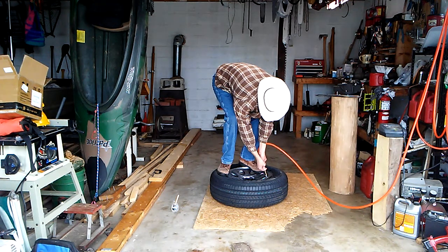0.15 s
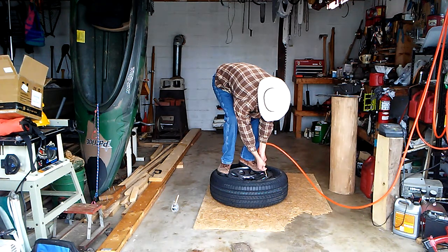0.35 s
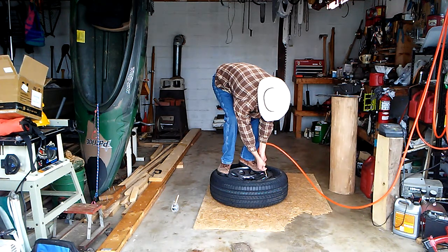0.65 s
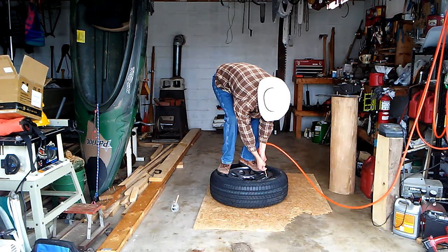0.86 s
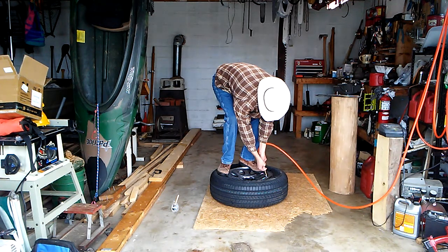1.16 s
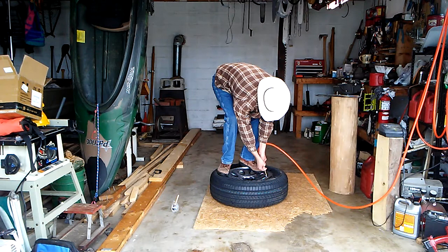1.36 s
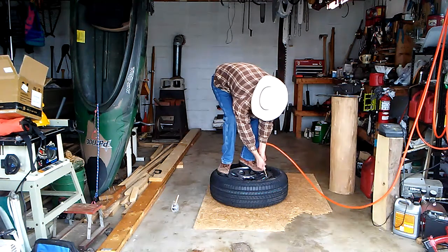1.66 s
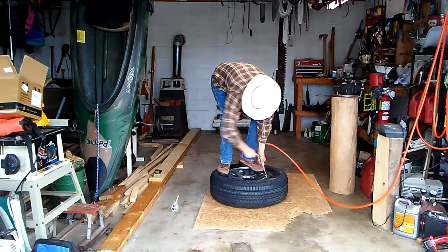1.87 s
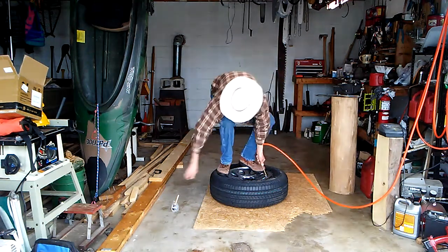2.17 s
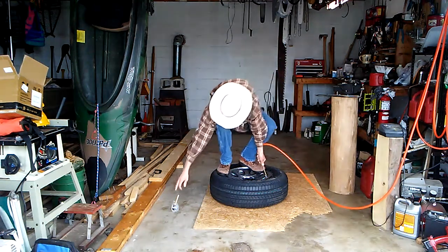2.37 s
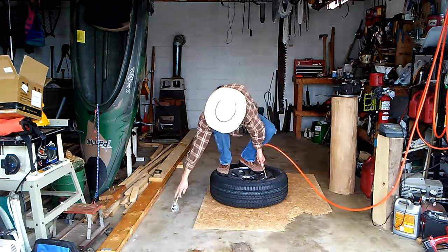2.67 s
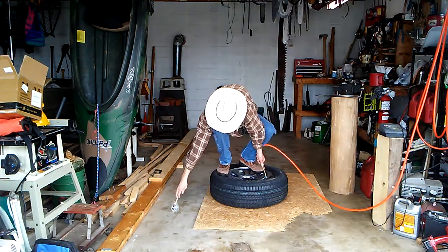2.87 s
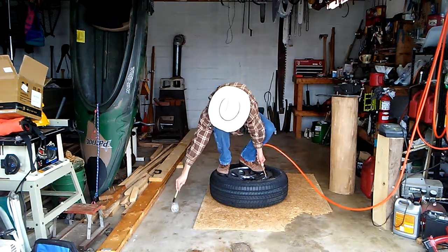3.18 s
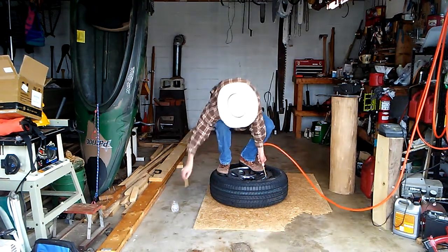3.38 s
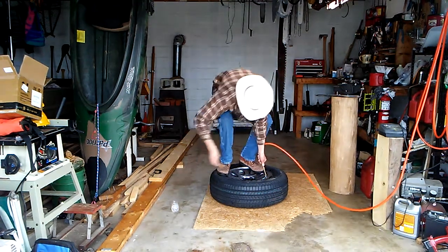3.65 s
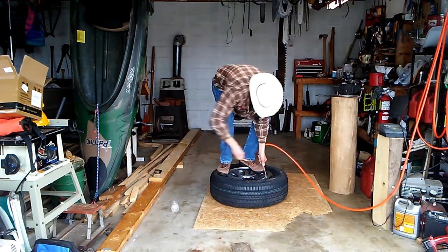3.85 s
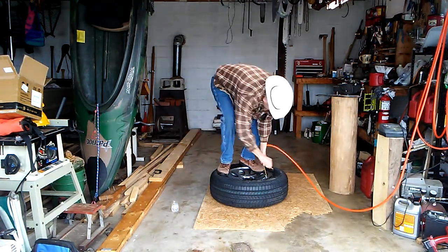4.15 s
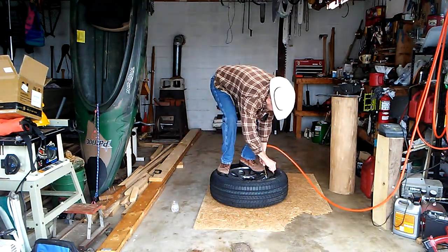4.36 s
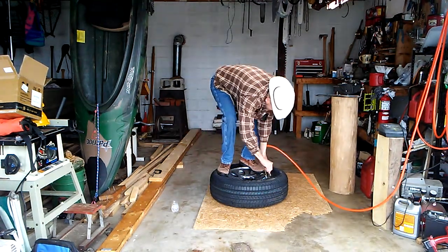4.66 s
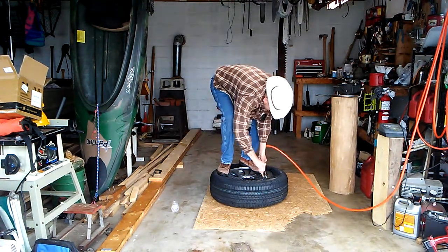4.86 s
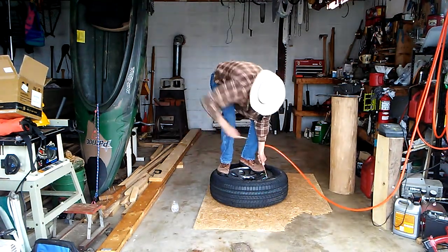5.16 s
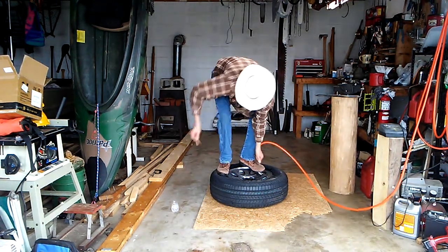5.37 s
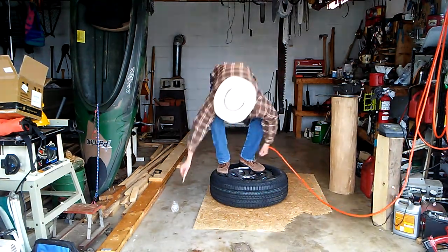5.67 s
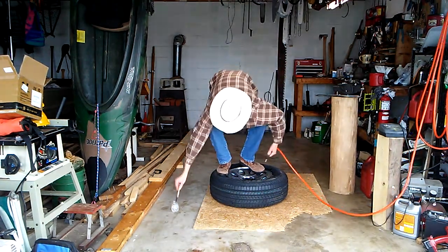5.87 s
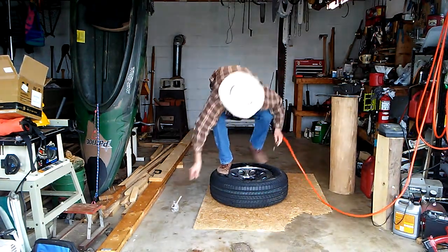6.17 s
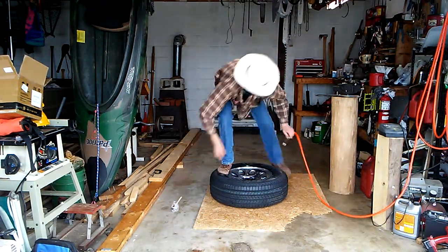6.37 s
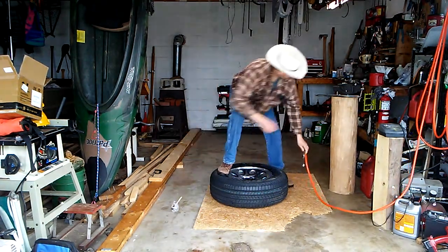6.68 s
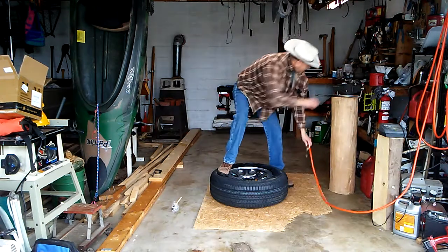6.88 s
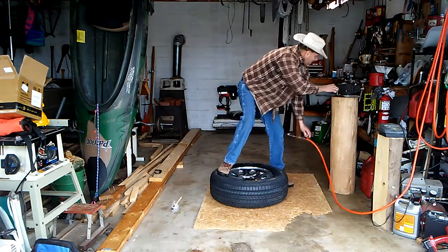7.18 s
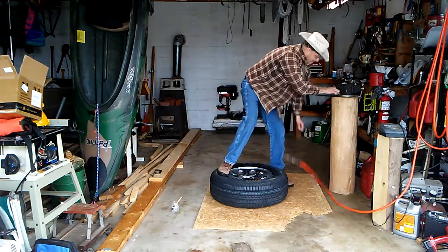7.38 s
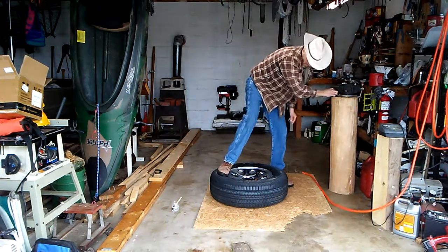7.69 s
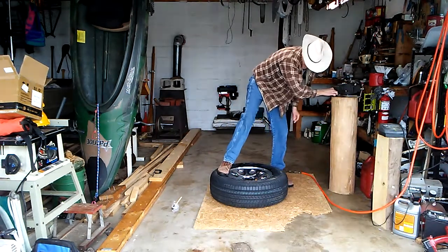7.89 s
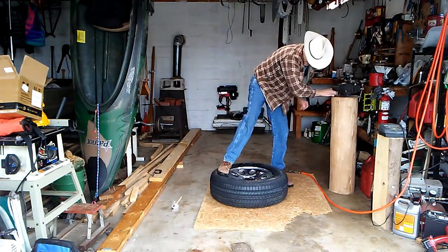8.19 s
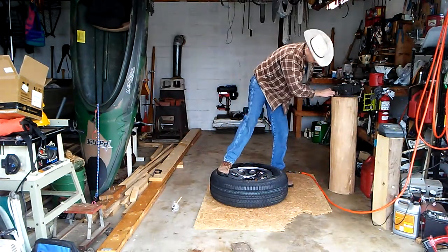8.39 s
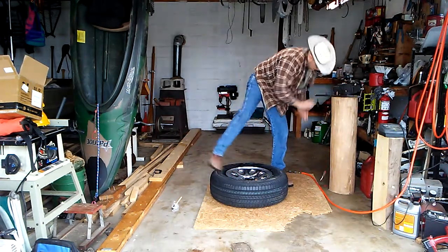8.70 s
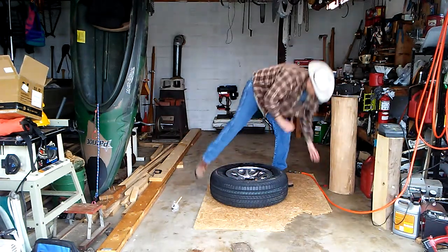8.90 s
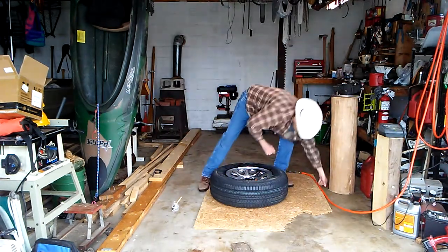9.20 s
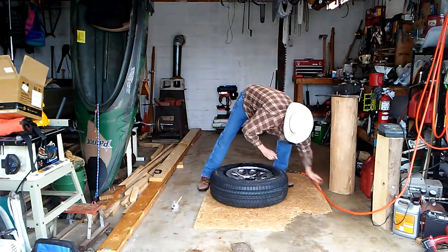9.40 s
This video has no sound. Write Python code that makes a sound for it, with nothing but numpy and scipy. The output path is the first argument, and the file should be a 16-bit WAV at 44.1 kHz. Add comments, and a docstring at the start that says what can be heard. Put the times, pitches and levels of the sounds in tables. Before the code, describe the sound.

In a cluttered garage, an air compressor runs without pause, a buzzing, clattering mid-range drone under a thin, wavering hiss. About three seconds in, air spits at a tyre valve and leaks on, fading. Near five seconds a heavy hollow knock judders, followed by another short spit. Later come bright clicks, small air spits and a softer knock. The microphone hears everything from some distance, centred, with short room reflections.

```python
"""An air compressor runs steadily in a cluttered garage while a tyre is filled through a hose.
Each shaft turn drives a stack of sine tones, a repeating clatter and two puffs of noise; faint steady tones
are likely its cooling fan. Filtered noise makes a thin hiss that surges and sags, and a jet of air at the valve
that spits as the chuck goes on and comes off. Short noise bursts make the clicks of metal fittings, and
trains of bursts make something heavy knock and judder."""
import sys
import numpy as np
from scipy import signal
from scipy.fft import rfft, irfft
from scipy.io import wavfile
from scipy.ndimage import uniform_filter1d, minimum_filter1d

SR = 44100
rng = np.random.default_rng(int(sys.argv[2]) if len(sys.argv) > 2 else 0)


def generate_wav(sig):
    """Save sig (samples, or channels by samples) to the path in sys.argv[1] as 16-bit PCM at SR."""
    pcm = np.round(np.clip(np.atleast_2d(sig).T, -1, 1) * 32767).astype(np.int16)
    wavfile.write(sys.argv[1], SR, pcm)


N = 420710
TIME = np.arange(N) / SR  # seconds
FREQ = np.maximum(np.fft.rfftfreq(N, 1 / SR), 1)  # Hz, kept above 0 so its logarithm exists

SHAFT_HZ = 54.46  # turns per second
# tones of the machine: shaft_multiple, relative_level_db
SHAFT_TONES = [(1, -46), (2, -54), (3, -41), (4, -41), (5, -40), (6, -38), (6.5, -33), (7, -27), (8, -36),
               (10, -35), (11, -29), (12, -28), (13, -29), (14, -33), (16, -33), (17, -31), (23, -30),
               (24, -36), (25, -38), (28, -36), (33, -31), (34, -30), (35, -33), (47, -36), (52, -35),
               (53, -38), (54, -34), (61, -38), (71, -38), (74, -39)]
# groups of tones that each swell once, slowly: centre_hz, reach_hz, resting_db, peak_s, half_length_s, lift_db
TONE_SWELLS = [(870, 30, -2, 8.2, .5, 7), (1850, 80, -1.5, 5.5, 1.9, 4.5), (2830, 30, -1, 1.18, 1.2, 9.5)]
# noise of the pump, cut off steeply at the top: pitch_hz, relative_level_db
PUMP_COLOUR = [(25, -101), (120, -79.5), (165, -62.5), (258, -58), (275, -52.5), (750, -52.5),
               (1050, -55.5), (1350, -56), (1950, -50.5), (2900, -53.5), (3400, -56.5), (4020, -59),
               (4230, -69), (4480, -101.5)]
# resonances of tank and shroud: centre_hz, width_hz, lift_db
SHROUD_RESONANCES = [(344.8, 47, 6), (894, 62, 4), (2154, 30, 6.5), (2453, 36, 5), (3740, 150, 7),
                     (4027, 28, 11)]
# a second, faster rotor, likely the cooling fan: pitch_hz, rms_level_db
FAN_TONES = [(91.8, -59), (183.6, -40.5), (195.5, -51)]

# tone colour of the thin hiss: pitch_hz, relative_level_db
HISS_SPECTRUM = [(4400, -26), (4750, -30), (5400, -12), (5900, -7), (7100, 2), (9100, 0.5), (9600, 0),
                 (11400, -5), (12200, -11), (13000, -23), (14000, -37), (15500, -62)]
# faint whistles within the hiss: centre_hz, width_hz, lift_db
HISS_WHISTLES = [(5840, 70, 8), (6180, 15, 13), (7540, 18, 3), (9160, 150, 6.5)]
# resting level of the hiss and the spread of its slower wander
HISS_DB, HISS_WANDER_DB = -33, .7
# times when the hiss rises fast and falls back more slowly: start_s, hold_s, lift_db
HISS_SURGES = [(0.608, 0.4, 2), (1.357, .06, 3.5), (1.77, .04, 3), (2.28, .08, 3.5), (6.3, .08, 3),
               (6.68, 0.053, 3), (7.43, 0.44, 2), (8.523, .1, 5), (9.18, .05, 2.5)]
SURGE_ATTACK_S, SURGE_T60_S = .03, 0.22  # t60: time to fall by 60 dB
# times when the hiss sags and then snaps back: return_s, depth_db
HISS_SAGS = [(.61, 4), (5.7, 5.5), (6.3, 8)]
SAG_LENGTH_S, SAG_RETURN_S = 0.24, .02  # whole sag, and the snap back at its end
# tone colour of the air jet: pitch_hz, relative_level_db
JET_SPECTRUM = [(2760, -72), (4700, -76), (4990, -28), (5710, -10.5), (6030, -4.5), (6900, 2), (8180, 5.5),
                (11300, 0), (15500, -28)]
# air escaping between chuck and valve: a long leak, stronger at first, a spit as the chuck goes on and
# as it comes off, and a last trickle: start_s, hold_s, level_db, t60_s
AIR_JETS = [(3.12, 2.25, -26.5, 0.97), (3.115, 0.73, -22.7, 2.2), (3.224, .01, -16, 0.59),
            (5.202, .006, -14.5, 0.27), (5.68, 0.4, -35, .3)]
JET_ATTACK_S = 0.048

# bright clicks, scuffs and spits of air from the fittings: start_s, relative_level_db, t60_s
CLICK_EVENTS = [(2.328, -30, .3), (4.97, -15, 0.054), (5.243, -26, 0.11), (7.531, -18.5, 0.46),
                (7.809, -22.5, 0.39), (8.366, -22, 0.51), (8.424, -24, .15), (8.551, -31, .2),
                (8.897, -30, .2)]
# tone colour of the clicks: pitch_hz, relative_level_db
CLICK_SPECTRUM = [(2800, -57), (4700, -37), (5700, -10), (7000, 1), (8400, 6), (9800, -3), (11500, -5),
                  (13000, -21), (15500, -35)]

# dull knocks that judder on: start_s, relative_body_db, relative_crack_db, hold_s, later_fade_db_per_s
KNOCK_EVENTS = [(4.967, -5.5, 7, 0.085, 100), (7.53, -19, -3, .015, 240)]
# tone colour of the hollow body: pitch_hz, relative_level_db
BODY_SPECTRUM = [(30, -11), (85, -25), (120, -16), (170, -7.5), (250, -1), (335, 8.5), (470, 6.5),
                 (600, 10.5), (750, -5), (950, -7), (1150, -16), (1550, -2), (2500, -41), (4500, -59),
                 (15000, -70)]
# tone colour of the crack on each blow: pitch_hz, relative_level_db
CRACK_SPECTRUM = [(30, -18), (100, -25), (180, -19), (380, -6), (510, 3), (680, 3.5), (780, 0), (910, -1),
                  (1200, -8), (1550, -7), (2500, -13), (3600, -10), (4700, -46), (7000, -19), (15000, -55)]
# tone colour of the snap on the hardest blows: pitch_hz, relative_level_db
SNAP_SPECTRUM = [(300, -12), (1200, 2), (4000, -4), (7000, -5), (12000, -5), (14500, -10), (15600, -24)]
# the blows of a judder come ever further apart, and each cracks less than the one before
JUDDER_GAP_S, JUDDER_GROWTH, CRACK_FALL_DB_PER_BLOW = .0065, 1.2, 3.5

CEILING, TOP_HZ = .97, 15700  # limiter ceiling (full scale is 1), and where the treble is cut


def undb(db):
    """Turn decibels into a multiplying gain."""
    return 10 ** (np.asarray(db) / 20)


def unit(x):
    """Scale to an rms (average strength) of 1."""
    return x / np.sqrt(np.mean(x ** 2))


def colour(x, points, resonances=()):
    """Shape a spectrum by points and resonances, with no sound ahead of the attack."""
    hz, db = np.transpose(points)
    lift_db = sum(lift / (1 + (2 * (FREQ - centre) / width) ** 2) for centre, width, lift in resonances)
    curve_db = np.interp(np.log(FREQ), np.log(hz), db) + lift_db
    # folding the cepstrum onto positive time gives a minimum-phase filter: attacks stay sharp
    cepstrum = irfft(np.log(undb(curve_db)), N)
    cepstrum[1:N // 2] *= 2
    cepstrum[N // 2 + 1:] = 0
    return irfft(rfft(x) * np.exp(rfft(cepstrum)), N)


def walk(rate):
    """Smooth random wander with spread 1, aiming at a new value rate times a second."""
    points = rng.standard_normal(4096)
    return np.interp(TIME * rate, np.arange(len(points)), points) * np.sqrt(3 / 2)


def garage(x, t60, wet_db):
    """Direct sound plus a dense, short echo tail from the walls and clutter."""
    t = TIME[:SR // 2]
    tail = rng.standard_normal(len(t)) * undb(-60 * t / t60) * (t > .004)
    wet = undb(wet_db)
    echo = signal.fftconvolve(x, tail / np.linalg.norm(tail))[:N]
    return (x + wet * echo) / np.hypot(1, wet)


def burst(start, db, t60):
    """A sudden push of noise that dies away."""
    age = TIME[:SR // 2]
    shot = rng.standard_normal(len(age)) * undb(db - 60 * age / t60)
    return np.pad(shot, (int(start * SR), N))[:N]


def envelope(start, attack, hold, t60):
    """Rise to 1, hold, die away."""
    age = TIME - start
    rise = np.clip(age / attack, 0, 1)
    return rise * undb(-60 * np.maximum(age - attack - hold, 0) / t60)


def tones(turns, tone_db=0.12, drift_db=-0.23, flutter=0.052):
    """Sine tones locked to the shaft; higher ones flutter and drift more in level."""
    out = 0
    for order, db in SHAFT_TONES:
        hz = order * SHAFT_HZ
        swell_db = sum(rest + lift * np.exp(-((TIME - peak) / length) ** 2)
                       for centre, reach, rest, peak, length, lift in TONE_SWELLS if abs(hz - centre) < reach)
        loose = min(hz / 700, 1)  # low tones stay steadier
        level = undb(db + swell_db + drift_db * loose * walk(1.116))
        level = level * (1 + flutter * loose * walk(30))
        out = out + level * np.sqrt(2) * np.sin(2 * np.pi * (order * turns + rng.random()))
    return out * undb(tone_db)


def clatter(turns, uneven_db=-10, clatter_hz=3200):
    """Valves and rod rattle in a repeating pattern, filling in between the main tones."""
    # a pattern two turns long: partials lie at every half multiple of the shaft rate
    partials = rng.standard_normal((1024, 2)) @ [1, 1j]
    partials[1::2] *= undb(uneven_db)  # alternate turns differ a little
    partials[[round(2 * order) for order, _ in SHAFT_TONES]] = 0
    cycle = unit(irfft(partials))
    rattle = np.interp(turns / 2, np.arange(len(cycle)) / len(cycle), cycle, period=1)
    # small hard parts radiate little bass
    return signal.sosfilt(signal.butter(1, clatter_hz, "high", fs=SR, output="sos"), rattle)


def pump(turns, clatter_db=-1.0, puff_db=-0.22, puff_decay=0.16, puff_depth=0.58, stroke_db=4.5):
    """Air puffs on intake and exhaust; the shroud rings with the puffs and the clatter."""
    half_turns = 2 * turns  # one puff in each half turn
    strength = undb(stroke_db * rng.standard_normal(2048))[half_turns.astype(int)]
    gate = 1 + puff_depth * strength * np.exp(-(half_turns % 1) / puff_decay)
    puffs = garage(unit(gate * rng.standard_normal(N)), t60=0.27, wet_db=-8.0)
    mix = clatter(turns) * undb(clatter_db) + puffs * undb(puff_db)
    return colour(mix, PUMP_COLOUR, SHROUD_RESONANCES) * np.sqrt(SR / 2)


def fan(waver=0.00066):
    """Faint low tones that share a slight waver in speed, apart from the shaft's."""
    clock = np.cumsum(1 + waver * walk(1.63)) / SR
    return sum(undb(db) * np.sqrt(2) * np.sin(2 * np.pi * (hz * clock + rng.random()))
               for hz, db in FAN_TONES)


def air(hiss_flicker_db=0.48, jet_flicker_db=0.57):
    """Noise of rushing air: a thin wavering hiss, and a sputtering jet between chuck and valve."""
    surge_db = sum(lift * envelope(start, SURGE_ATTACK_S, hold, SURGE_T60_S)
                   for start, hold, lift in HISS_SURGES)
    sag_db = sum(depth * np.interp(TIME, [end - SAG_LENGTH_S, end - SAG_RETURN_S, end], [0, 1, 0]) ** 2
                 for end, depth in HISS_SAGS)
    hiss = unit(colour(rng.standard_normal(N), HISS_SPECTRUM, HISS_WHISTLES))
    wander_db = hiss_flicker_db * walk(25) + HISS_WANDER_DB * walk(8)
    hiss *= undb(HISS_DB + surge_db - sag_db + wander_db)
    jet = unit(colour(rng.standard_normal(N), JET_SPECTRUM))
    # overlapping jets add by power
    power = sum((undb(db) * envelope(start, JET_ATTACK_S, hold, t60)) ** 2
                for start, hold, db, t60 in AIR_JETS)
    return hiss + jet * np.sqrt(power) * undb(jet_flicker_db * walk(40))


def clicks(click_db=4, ping_db=-41, ping_hz=12900, ping_t60=.15):
    """Short bright contacts and spits of air as noise bursts; one late contact also pings."""
    bursts = sum(burst(start, db, t60) for start, db, t60 in CLICK_EVENTS)
    contacts = colour(bursts, CLICK_SPECTRUM) * undb(click_db)
    ping = signal.lfilter(*signal.iirpeak(ping_hz, 10, fs=SR), burst(8.551, 10, ping_t60))
    return contacts + ping * undb(ping_db)


def judder(count=12):
    """Each knock bounces on as a train of slowing blows: rows of start_s, body_db, crack_db."""
    blow = np.arange(count)
    age = JUDDER_GAP_S * (np.cumsum(JUDDER_GROWTH ** blow) - JUDDER_GROWTH ** blow)
    rows = []
    for start, body_db, crack_db, hold, fade in KNOCK_EVENTS:
        fade_db = fade * np.maximum(age - hold, 0)
        rows += zip(start + age, body_db - fade_db, crack_db - CRACK_FALL_DB_PER_BLOW * blow - fade_db)
    return rows


def knocks(knock_db=13, crack_db=14, t60=0.049, crack_t60=0.0096, snap_db=-11, snap_t60=.012):
    """Heavy blows on a hollow, well damped body boom and crack; the hardest also snap."""
    blows = judder()
    body_bursts = sum(burst(start, db, t60) for start, db, _ in blows)
    crack_bursts = sum(burst(start, db, crack_t60) for start, _, db in blows)
    # only blows with a crack above 0 dB snap
    snap_bursts = sum(burst(start, db, snap_t60) * (db > 0) for start, _, db in blows)
    body = colour(body_bursts, BODY_SPECTRUM) * undb(knock_db)
    crack = colour(crack_bursts, CRACK_SPECTRUM) * undb(crack_db)
    snap = colour(snap_bursts, SNAP_SPECTRUM) * undb(snap_db)
    return garage(body, t60=0.48, wet_db=-5.0) + garage(crack, t60=0.17, wet_db=-2) + snap


def scene():
    """The shaft speed wavers slightly; everything reaches both channels alike."""
    speed = SHAFT_HZ * (1 + 0.000728 * walk(2) + 0.001287 * walk(27))
    turns = np.cumsum(speed) / SR
    machine = tones(turns) + pump(turns) + fan()
    mono = machine + air() + clicks() + knocks()
    return np.array([mono, mono])


def record(dry):
    """A fast limiter turns down peaks above the ceiling, then a steep filter cuts the top."""
    room_left = CEILING / np.maximum(abs(dry).max(axis=0), CEILING)
    gain = uniform_filter1d(minimum_filter1d(room_left, size=89), size=89)  # 89 samples: about 2 ms
    return signal.sosfilt(signal.ellip(10, .1, 80, TOP_HZ, fs=SR, output="sos"), dry * gain)


dry = scene()
out = record(dry)
generate_wav(out)
```